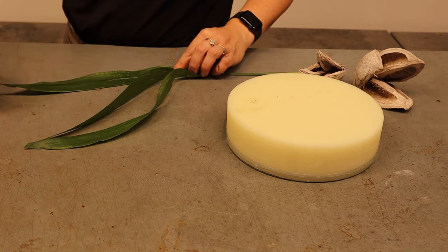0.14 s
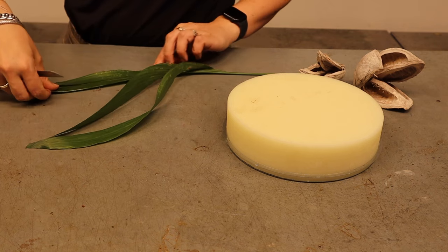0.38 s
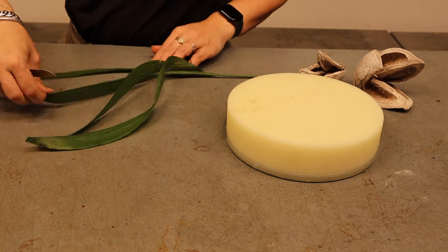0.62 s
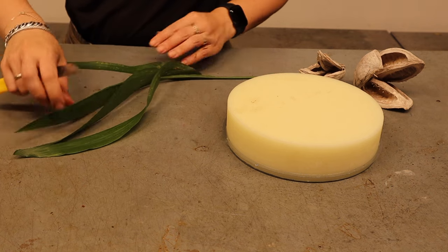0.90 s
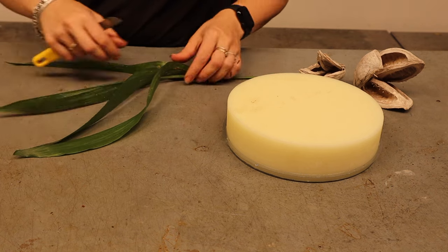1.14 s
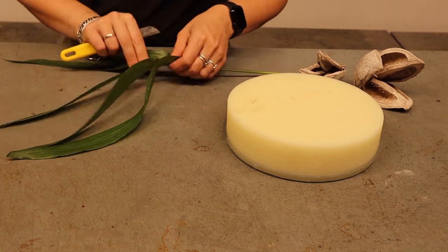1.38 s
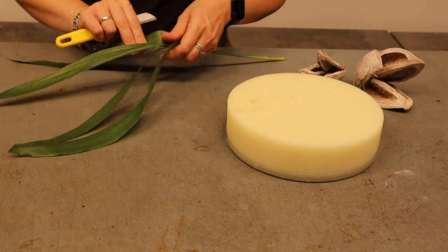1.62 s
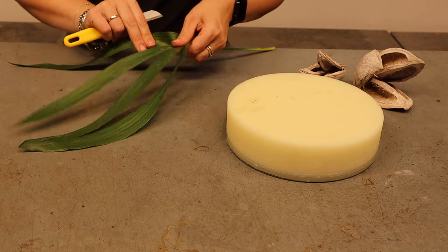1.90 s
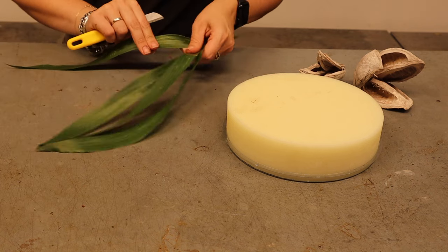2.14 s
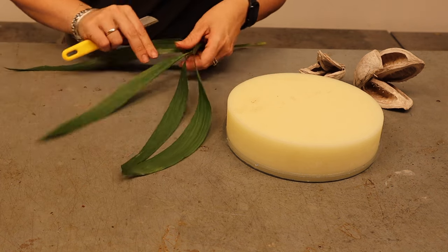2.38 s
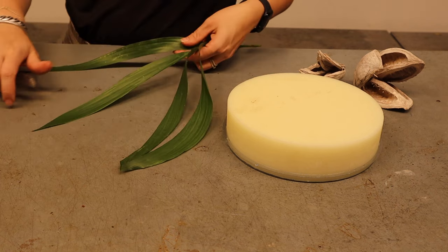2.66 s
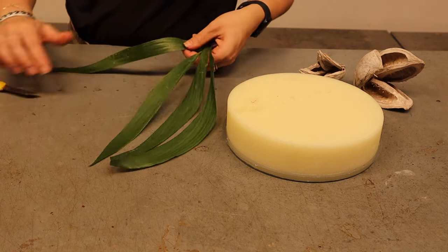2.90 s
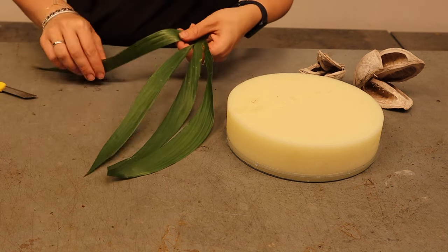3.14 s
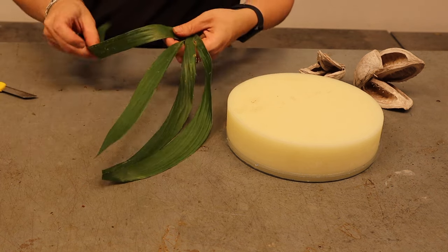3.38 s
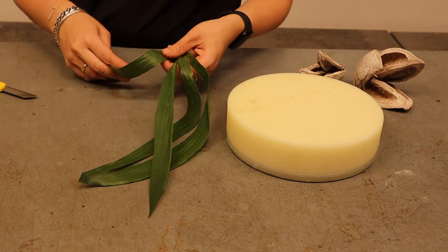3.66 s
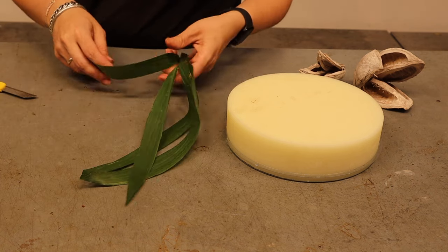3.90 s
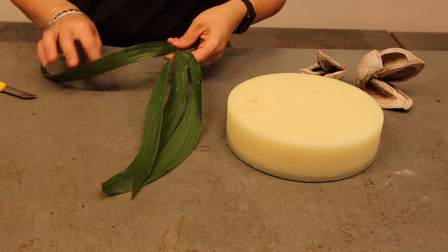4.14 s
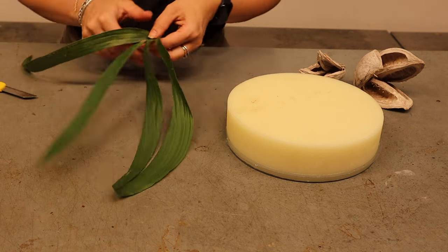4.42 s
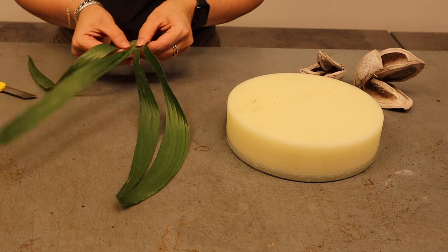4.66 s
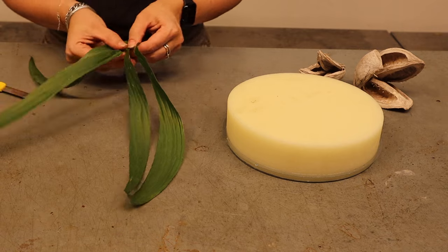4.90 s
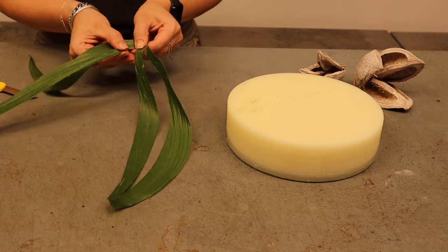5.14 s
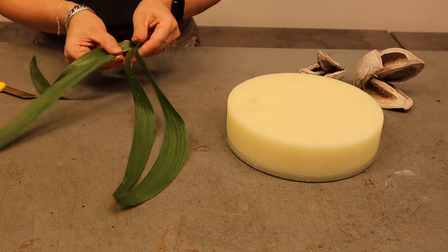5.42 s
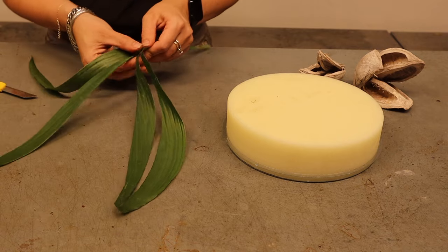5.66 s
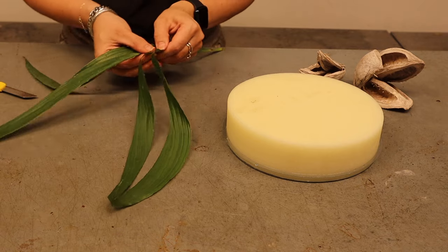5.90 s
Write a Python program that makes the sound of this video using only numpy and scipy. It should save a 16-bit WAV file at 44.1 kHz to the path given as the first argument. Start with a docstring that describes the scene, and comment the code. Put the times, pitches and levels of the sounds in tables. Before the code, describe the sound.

Close microphone at a worktable, short room echo, low mains hum and hiss. A brief hard scrape opens, then fibrous rustling and tiny ticks. A bright crackling snap is followed by papery slides that swell strongest before a knife clatters down with hollow plastic and wooden-sounding knocks. Sparse rustles and finger taps continue, ending in crisp flicks and a faint waxy squeak.

```python
"""A small, quiet room: a long leaf is slit and handled over a worktable.
Something hard is dragged to a stop; strips rustle as dense random grains, tick and tap as short noise bursts.
The blade punches through with a snap, the plastic-handled knife drops and bounces through resonators,
and a waxy strip squeaks late on. Mains hum and microphone hiss lie below; echoes are decaying noise."""
import sys
import numpy as np
from scipy import signal
from scipy.fft import rfft, irfft
from scipy.io import wavfile

SR = 44100
rng = np.random.default_rng(int(sys.argv[2]) if len(sys.argv) > 2 else 0)


def elevation(decibels):
    """Turn decibel levels (scalar or array-like) into linear amplitude ratios."""
    levels = np.asarray(decibels, float)
    return 10 ** (levels / 20)


def wrap_up_sound(samples):
    """Save the sound to the file named by the first command line argument, as 16-bit audio."""
    columns = np.atleast_2d(samples).T
    # keep every value between -1 and 1, then stretch to whole-number steps
    tamed = np.clip(columns, -1, 1)
    steps = np.round(tamed * 32767).astype(np.int16)
    wavfile.write(sys.argv[1], SR, steps)


N = 266364
BURST_N = 4096


def rms_one(x):
    """Scale to unit rms."""
    return x / np.sqrt(np.mean(x ** 2) + 1e-20)


def at_hz(points, hz):
    """Read a table along a log-frequency axis."""
    table_hz, values = np.transpose(points)
    return np.interp(np.log(hz), np.log(table_hz), values)


def coloured(x, spectrum):
    """Give a flat noise the spectrum of a table; rms 1."""
    hz = np.maximum(np.arange(len(x) // 2 + 1) * SR / len(x), 1)
    return rms_one(irfft(rfft(x) * elevation(at_hz(spectrum, hz)), len(x)))


def band(x, low_hz, high_hz):
    """Causal band-pass."""
    sos = signal.butter(2, [low_hz, high_hz], "band", fs=SR, output="sos")
    return signal.sosfilt(sos, x + 1e-18)


def resonances(x, peaks):
    """Parallel two-pole resonators with alternating signs."""
    out = 0
    for k, (hz, width_hz, db) in enumerate(peaks):
        r = np.exp(-np.pi * width_hz / SR)
        zeros = np.array([1, 0, -1]) * (1 - r * r) / 2
        poles = [1, -2 * r * np.cos(2 * np.pi * hz / SR), r * r]
        out = out + (-1) ** k * elevation(db) * signal.lfilter(zeros, poles, x)
    return out


def drift(rate_hz):
    """Low-passed noise of spread 1."""
    r = np.exp(-2 * np.pi * rate_hz / SR)
    noise = rng.standard_normal(N + SR)
    return rms_one(signal.lfilter([1], [1, -2 * r, r * r], noise)[SR:])  # settled part


def grains(per_s, spread_db, clump_db):
    """Dense random clicks of uneven size that come in clumps."""
    sizes = elevation(spread_db * np.minimum(rng.exponential(1, N), 5)) * rng.choice([-1, 1], N)
    fired = rng.random(N) < per_s / SR
    return sizes * fired * elevation(clump_db * drift(58.0))


def level_curve(points):
    """Gain interpolated in dB between the points of a table."""
    s, db = np.transpose(points)
    return elevation(np.interp(np.arange(N) / SR, s, db))


def swells(rows):
    """Each row swells to its peak and fades; gains add in power, one line per level column."""
    drop_db, roundness = 19.5, 1.215  # loss after one rise or fall time; 1 = pointed, 2 = rounded top
    t, power = np.arange(0, N, 32) / SR, 1e-14
    for s, rise_s, fall_s, *levels_db in rows:
        away = np.where(t < s, (s - t) / rise_s, (t - s) / fall_s)
        power = power + elevation(np.array(levels_db)[:, None] - drop_db * away ** roundness) ** 2
    return [np.interp(np.arange(N) / SR, t, np.sqrt(p)) for p in power]


def burst_shape(decay_ms, edge):
    """A contact starts with a firm edge and chatters away."""
    ms = np.arange(BURST_N) / SR * 1000
    return np.exp(-ms / max(decay_ms, 0.2)) + edge * np.exp(-ms / 0.14)


def add_peaked(out, at, part, db):
    """Add a burst into out, scaled to its peak level."""
    out[at:at + BURST_N] += elevation(db) * part / np.abs(part).max()


def pitched_contacts(rows, decay_ms, width_ratio, edge):
    """A short rough contact rings a few cycles around its pitch."""
    out = np.zeros(N + BURST_N)
    shape = burst_shape(decay_ms, edge)
    for s, db, hz in rows:
        burst = rng.standard_normal(BURST_N) * shape
        part = band(burst, hz / width_ratio, min(hz * width_ratio, 19000))
        add_peaked(out, round(s * SR), part, db)
    return out[:N]


# bands of a contact, in order crack, clack, body, thud: low_hz, high_hz
CONTACT_BANDS = [(6500, 13050), (2180, 6560), (780, 2550), (135, 750)]


def contacts(rows, edge):
    """Each contact is a short rough burst; its four bands are set to their peak levels."""
    out = np.zeros((4, N + BURST_N))
    for s, *levels_db, decay_ms in rows:
        bursts = rng.standard_normal((4, BURST_N)) * burst_shape(decay_ms, edge)
        for k, ((low_hz, high_hz), db) in enumerate(zip(CONTACT_BANDS, levels_db)):
            add_peaked(out[k], round(s * SR), band(bursts[k], low_hz, high_hz), db)
    return out[:, :N]


# hiss and rumble spectrum: freq_hz, relative_db
HISS_SPECTRUM = [(15, -21), (25, -16), (48, -2), (97, -2), (145, -5.5), (195, -5), (249, -9), (301, -5.5),
                 (451, -9.5), (3080, -17), (8360, -20), (15400, -22.5), (16000, -28)]
# mains harmonics: freq_hz, level_db (rms, about which it wavers)
MAINS_HUM = [(50, -89), (100, -64.5), (200, -69), (300, -71.5), (400, -75)]


def background():
    """Steady hiss and rumble with slightly wavering mains harmonics."""
    t = np.arange(N) / SR
    hum = 0
    for hz, db in MAINS_HUM:
        gain = np.sqrt(2) * elevation(db + 3.85 * drift(11.3))
        hum = hum + gain * np.sin(2 * np.pi * (hz * t + rng.random()))
    return elevation(-54.5) * coloured(rng.standard_normal(N), HISS_SPECTRUM) + hum


# hard object dragged to a stop on the table: time_s, level_db
DRAG_LEVEL = [(0, -23), (.02, -26.5), (0.039, -25.5), (.055, -34.5), (.075, -44), (.1, -75)]
# its ringing: freq_hz, width_hz, relative_db
DRAG_MODES = [(760, 57, 1), (1760, 270, -9.5), (2110, 210, -5), (4070, 950, -20), (5350, 270, -11.5),
              (7870, 1800, -13.5), (11000, 7600, -22.5)]


def drag():
    """Stick-slip grains excite the dragged object."""
    stick_slip = grains(6000, spread_db=1.0, clump_db=1.5)
    return level_curve(DRAG_LEVEL) * rms_one(resonances(stick_slip, DRAG_MODES))


# fine hiss of fibres: freq_hz, relative_db_per_hz
FINE_SPECTRUM = [(2940, -61), (5000, -14), (6160, -4.5), (8330, 3), (9370, -3), (13600, -8.5),
                 (15500, -9.5), (16000, -30)]
# coarse rasp: freq_hz, relative_db_per_hz
COARSE_SPECTRUM = [(1000, -9), (1800, -4.5), (2500, -1), (3800, 2.5), (5500, 4), (8000, -13.5)]
# leaf strips sliding and tearing: peak_s, rise_s, fall_s, fine_db, coarse_db
STRIP_SLIDES = [(0.275, 0.023, 0.17, -50, -55.5), (0.43, .2, 0.047, -54, -55), (0.49, .02, 0.05, -51, -66),
                (0.535, 0.065, .06, -51.5, -59), (0.645, 0.065, 0.12, -45, -51), (0.7, .1, .12, -46, -53),
                (0.745, .1, 0.056, -51, -50), (0.868, 0.032, 0.036, -53.5, -63),
                (1.3, 0.054, .15, -55, -53.5), (1.365, 0.093, 0.08, -54, -52.5), (1.49, .1, 0.1, -59, -62),
                (1.571, 0.045, 0.089, -50, -58.5), (1.7, .2, 0.1, -57, -66), (1.95, .02, 0.11, -48.5, -50),
                (2.14, 0.34, .15, -55, -61.5), (2.25, 0.085, 0.13, -43, -42.5),
                (2.305, 0.1, 0.092, -42, -57), (2.465, 0.17, .15, -52, -57.5),
                (2.579, 0.08, 0.071, -49.5, -58), (2.775, .12, .03, -55, -69),
                (3.372, 0.19, 0.08, -57.5, -63), (3.557, .01, 0.038, -51, -56),
                (3.68, 0.22, 0.085, -53, -54), (4.12, 0.6, .12, -57, -58), (4.27, 0.27, .4, -60.5, -63.5),
                (4.485, .02, .12, -54, -59.5), (4.61, 0.18, 0.165, -48.5, -54),
                (4.66, 0.017, 0.033, -45.5, -58), (4.96, 0.18, 0.15, -61, -62), (5.054, .04, .06, -60, -52),
                (5.178, 0.065, 0.043, -53.5, -66), (5.298, 0.013, 0.035, -38.5, -37),
                (5.5, 0.63, 0.24, -59.5, -57), (5.745, .3, 0.19, -57, -57)]
# hands and leaf rubbing on the table top: peak_s, rise_s, fall_s, level_db
TABLE_RUBS = [(0.3, 0.037, .07, -49.5), (0.46, 0.24, 0.36, -56), (0.6, 0.082, 0.35, -54),
              (0.868, 0.021, 0.081, -56.5), (1.36, 0.18, 0.33, -52), (1.96, 0.05, 0.34, -58.5),
              (2.15, .15, 0.65, -58.5), (2.77, 0.085, .05, -63), (3.22, .1, .1, -62),
              (3.52, 0.43, 0.1, -60.5), (3.68, .08, 0.1, -60), (4.15, 0.41, 0.56, -60),
              (4.48, 0.37, 0.52, -60), (4.66, 0.11, 0.066, -54), (4.9, 0.43, 0.36, -57.5),
              (5.1, 0.099, 0.98, -61), (5.3, 0.037, 0.14, -52.5), (5.572, 0.25, 0.36, -57),
              (5.752, 0.047, 0.086, -49)]


def rustle():
    """Fibres tear and slip as dense grains: a fine hiss, a coarser rasp and a dull rub on the table."""
    fine_gain, coarse_gain = swells(STRIP_SLIDES)
    rub_gain, = swells(TABLE_RUBS)
    fine = coloured(grains(9900, spread_db=0.5, clump_db=3.0), FINE_SPECTRUM)
    coarse = coloured(grains(5000, spread_db=3.0, clump_db=1.0), COARSE_SPECTRUM)
    dull = rms_one(band(grains(2000, spread_db=2.5, clump_db=3.0), 340, 1920))
    return fine_gain * fine + coarse_gain * coarse + rub_gain * dull


# stiff leaf edges ticking: start_s, level_db, pitch_hz
LEAF_TICKS = [(0.259, -37, 7700), (0.2717, -30.5, 7100), (0.39, -36, 2570), (0.4324, -35, 7950),
              (0.5973, -31, 4100), (0.747, -39, 8500), (0.8653, -33, 5260), (1.3731, -22.5, 1100),
              (1.3733, -30.5, 3300), (1.4827, -38, 7500), (1.5695, -36, 13500), (1.9413, -33.5, 7050),
              (1.9602, -35, 7400), (2.1541, -33, 7800), (2.3826, -38, 9700), (2.4647, -34, 6560),
              (3.286, -35, 12800), (3.3755, -31.5, 8360), (3.5518, -33, 3060), (3.552, -28, 8500),
              (3.5959, -30.5, 9500), (3.936, -41, 9600), (3.9855, -38, 7600), (4.4809, -31, 8500),
              (4.4811, -33, 13300), (4.5616, -32, 12600), (4.659, -24, 8800), (4.9738, -34, 8900),
              (5.0456, -31, 5500), (5.0539, -32, 8160), (5.152, -40, 5000), (5.2878, -20, 8500),
              (5.2977, -19, 8650), (5.3026, -25, 8160), (5.463, -35, 13000), (5.5194, -33.5, 8800),
              (5.52, -38, 12800), (5.565, -23, 3900), (5.6314, -29, 3960), (5.7444, -38, 2400)]


def leaf_ticks():
    """Stiff leaf edges flick: very short, narrow bursts."""
    return pitched_contacts(LEAF_TICKS, decay_ms=1.0, width_ratio=1.26, edge=1.2)


# fingers and stem tapping softly: start_s, level_db, pitch_hz
SOFT_TAPS = [(0.2925, -35.5, 185), (0.2976, -31.5, 710), (0.3099, -39, 348), (0.39, -38, 970),
             (0.5973, -43, 870), (0.747, -42, 2140), (0.8653, -41, 1890), (0.9357, -42, 655),
             (1.9413, -45.5, 690), (2.035, -39, 865), (2.0451, -44, 330), (2.4647, -31.5, 1030),
             (2.4952, -37.5, 930), (3.3168, -41.5, 1300), (3.5518, -36, 2280), (3.6952, -41, 2140),
             (3.936, -39.5, 1430), (4.2668, -34.5, 830), (4.674, -31, 1150), (4.682, -35.5, 780),
             (4.8137, -35.5, 1110), (5.0456, -38.5, 1020), (5.0539, -34.5, 1280), (5.0604, -32.5, 990),
             (5.152, -42, 1230), (5.2878, -31, 1170), (5.3026, -35.5, 1430), (5.6314, -27, 1550),
             (5.632, -38, 410), (5.7444, -33, 1700), (5.7846, -39, 1680)]


def soft_taps():
    """Fingers and stem tap: longer, mostly lower bursts with a firm edge."""
    return pitched_contacts(SOFT_TAPS, decay_ms=2.9, width_ratio=1.43, edge=2.2)


# blade breaking through the leaf, fibre by fibre: start_s, relative_crack_db
FIBRE_BREAKS = [(1.3935, -9), (1.3949, 1.5), (1.397, -11.5), (1.3988, -4), (1.4002, -9), (1.4014, -5.5),
                (1.4036, -10.5)]


def punch():
    """The taut leaf rings near 9.6 and 14.6 kHz at each broken fibre; it is too light for deep bass."""
    clack_db, body_db, thud_db, decay_ms = -9, -12, -30, 0.5  # levels against the crack
    rows = [(s, db, db + clack_db, db + body_db, db + thud_db, decay_ms) for s, db in FIBRE_BREAKS]
    crack, clack, body, thud = contacts(rows, edge=0.24)
    ringing = elevation(0.5) * resonances(crack, [(9600, 7300, 0.13), (14600, 2400, 2.6)])
    return ringing + elevation(-16.0) * crack + clack + body + band(thud, 330, 907)


# knife striking the table: start_s, crack_db (blade), clack_db, handle_db, decay_ms; levels relative
KNIFE_BOUNCES = [(2.7855, -38, -37, -63, 12), (2.8138, -9, -3, -17.5, 3.7), (2.8209, -29, -7, -16, 1),
                 (2.8322, -32, -10, -19.5, 3.3), (2.8551, -47, -25.5, -9, 2.4), (2.8598, -26, -11, -4, 4.4),
                 (2.8652, -1, -10.5, -7, 3), (2.8704, -18.5, -29.5, -17.5, 1.4),
                 (2.8938, -18, -10, -33, 2.4), (2.9611, -6.5, -5.5, -3.5, 7.7), (2.9667, -4, -1, -2, 1.9),
                 (2.9754, -34, -30, -12, 3), (3.0134, -42.5, -37, -14, 2.6), (3.0289, -8, -1, -8, 3.2),
                 (3.0415, -22, -7, -8.5, 3.8), (3.0484, -22, -15, -19.5, 2)]
# handle and table top ringing when struck: freq_hz, width_hz, relative_db
HANDLE_MODES = [(147, 45, -11), (184, 14, -3.5), (330.3, 7, 2), (371, 37, -3), (480, 25, -4.5),
                (549, 27, 1.5), (710, 48, -2), (746, 7.9, 4.5), (834, 93, -9), (1030, 150, 3.5),
                (1302, 140, 2), (1514, 43, 2), (1804, 39, -2.5), (2047, 41, 6), (2450, 420, -17)]


def knife_drop():
    """The low bands of every bounce also set handle and table top ringing."""
    thud_db, thud_follows = -16, 0.22  # thud at handle 0 dB; share of the handle's level it follows
    rows = [(s, crack_db, clack_db, handle_db, thud_db + thud_follows * handle_db, decay_ms)
            for s, crack_db, clack_db, handle_db, decay_ms in KNIFE_BOUNCES]
    crack, clack, body, thud = contacts(rows, edge=0.96)
    direct = elevation(0.5) * (body + band(thud, 322, 1190))
    ringing = elevation(6.5) * resonances(body + thud, HANDLE_MODES)
    return crack + clack + direct + ringing


# squeak: time_s, level_db
SQUEAK_LEVEL = [(5.64, -93), (5.67, -53), (5.74, -55), (5.8, -65), (5.85, -88)]


def squeak():
    """A waxy strip sliding between fingers hisses in one narrow band."""
    narrow = rms_one(resonances(rng.standard_normal(N), [(4900, 300, 0)]))
    return level_curve(SQUEAK_LEVEL) * narrow


# microphone capsule peak: freq_hz, width_hz, relative_db
CAPSULE_PEAK = (8670, 1250, 7.5)


def capsule(x):
    """The capsule's resonance lifts the treble."""
    return elevation(-2.5) * (x + resonances(x, [CAPSULE_PEAK]))


# room decay: freq_hz, t60_s
ROOM_DECAY = [(200, 0.46), (400, 0.26), (1000, 0.25), (2800, 0.29), (7300, 0.33), (11000, 0.13),
              (14500, 0.25)]


def room(x):
    """Diffuse echoes start after a few ms and die band by band."""
    early_db, early_t60_s = -1.5, 0.063  # first echoes off table and near wall, soon gone
    t, tail = np.arange(SR // 2) / SR, 0
    early = elevation(early_db - 60 * t / early_t60_s)
    edges_hz = 140 * 2 ** np.arange(0, 7.1, 0.5)
    for low_hz, high_hz in zip(edges_hz, edges_hz[1:]):
        t60_s = at_hz(ROOM_DECAY, np.sqrt(low_hz * high_hz))
        noise = band(rng.standard_normal(len(t)), low_hz, high_hz)
        tail = tail + noise * (elevation(-60 * t / t60_s) + early)
    tail = tail * np.clip((t - 0.003) / 0.0027, 0, 1)
    return signal.fftconvolve(x, tail / np.sqrt(np.sum(tail ** 2)))[:N]


def scene():
    """Near sounds with their room over the background; the capsule peak lifts drop and snap."""
    dragging = drag()
    slides = rustle() + squeak()
    taps = leaf_ticks() + soft_taps()
    snap, drop = capsule(punch()), capsule(knife_drop())
    sent = elevation(-10.5) * dragging + elevation(-13.5) * slides + elevation(-6.0) * taps
    sent = sent + elevation(-7.5) * snap + elevation(-8) * drop
    near = dragging + slides + taps + snap + drop
    return (near + room(sent) + background())[None]


def band_limit(x):
    """A steep low-pass at the top of the band."""
    return signal.sosfilt(signal.butter(12, 16440, fs=SR, output="sos"), x)


def record(dry):
    """Peaks are rounded off softly."""
    mix = 1.057 * np.tanh(dry / 1.152)
    return band_limit(mix)


dry = scene()
out = record(dry)
wrap_up_sound(out)
```